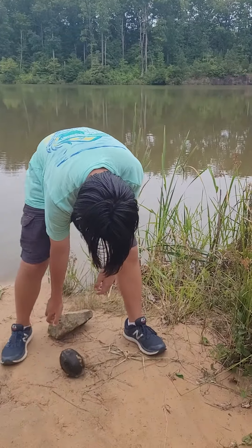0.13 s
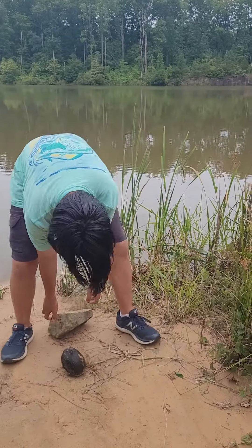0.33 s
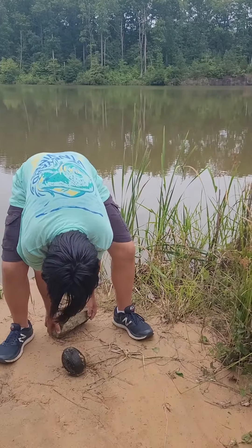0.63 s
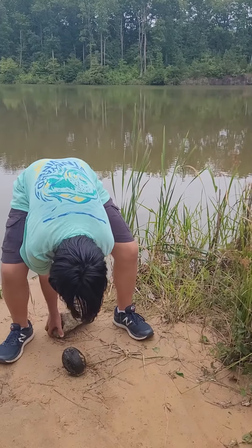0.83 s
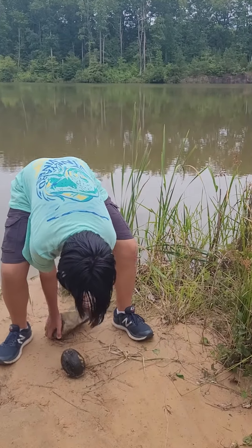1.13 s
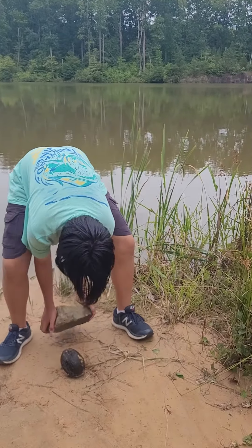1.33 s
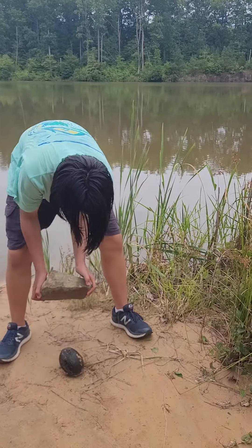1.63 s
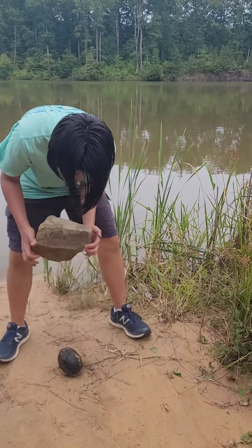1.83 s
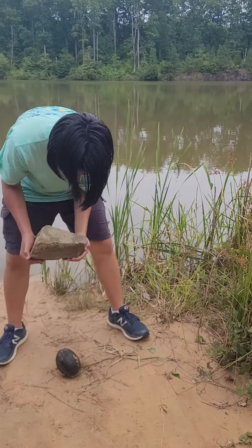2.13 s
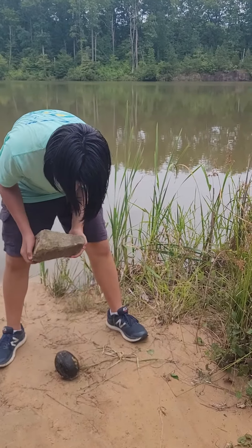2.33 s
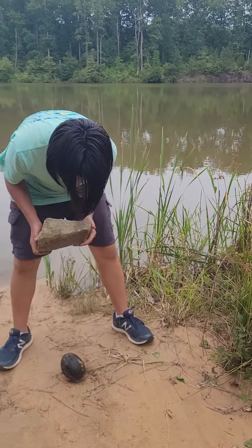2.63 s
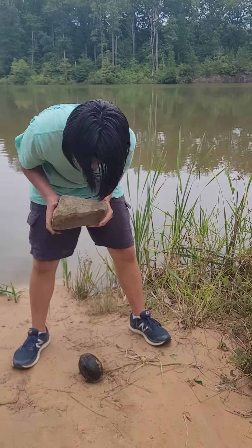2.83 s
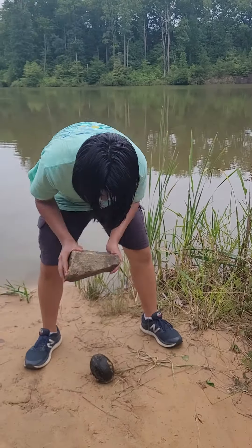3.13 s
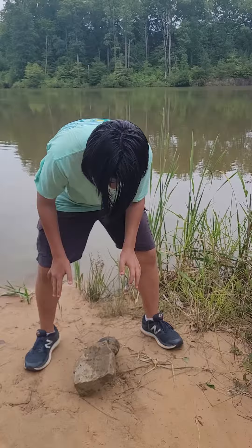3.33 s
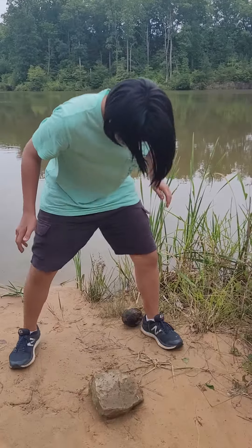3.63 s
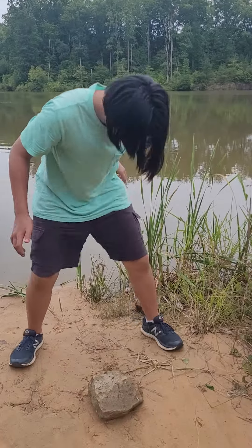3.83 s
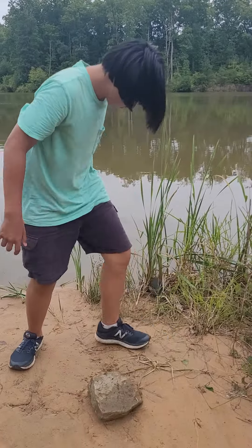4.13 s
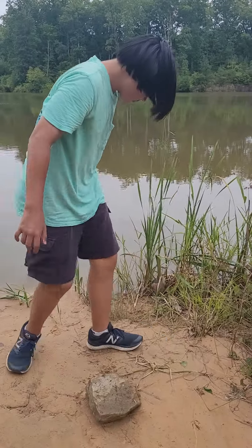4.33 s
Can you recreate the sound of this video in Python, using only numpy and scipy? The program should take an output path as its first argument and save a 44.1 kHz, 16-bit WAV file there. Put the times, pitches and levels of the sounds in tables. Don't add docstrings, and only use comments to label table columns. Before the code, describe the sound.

A quiet open-air shore, heard close up in stereo with no room echo. A distant engine drones low and unevenly throughout, with faint hum, a thin wavering whine and a soft low wash that swells and sinks. At 0.1 to 0.4 s sand scrapes and slips crisply as a stone is shifted, with small dull bumps. From 0.5 to 3 s there is little but the drone and faint brushes of cloth, growing slightly after 2 s. A rustle rises at 3.2 s, then at 3.28 s the stone hits the coconut: by far the loudest sound, a sharp, woody, hollow clack with bright shell ring, a gritty grind and a second knock about 0.03 s later, ending in a low thud. Around 3.55 to 3.62 s the stone slaps dully onto sand with a gritty slip. Cloth rustles and light shoe scuffs follow, clearest near 4.0 to 4.2 s, over the continuing drone.

```python
import sys
import numpy as np
from scipy import signal
from scipy.fft import rfft, irfft, next_fast_len
from scipy.io import wavfile
from scipy.ndimage import uniform_filter1d

SR = 44100
rng = np.random.default_rng(int(sys.argv[2]) if len(sys.argv) > 2 else 0)


def boost_factor(decibels):
    exponent = np.asarray(decibels, float) / 20
    return 10 ** exponent


def store_pcm(level_fs):
    pcm = np.round(np.clip(level_fs, -1, 1) * 32767).astype(np.int16)
    wavfile.write(sys.argv[1], SR, np.atleast_2d(pcm).T)


N = 198405
FAR_LAG = 7


def evened(x):
    return x / np.sqrt(np.mean(x ** 2) + 1e-20)


def read(points, hz):
    f, value = np.transpose(points)
    return np.interp(np.log(hz + 1), np.log(f + 1), value)


def curves(rows):
    s, *columns = np.transpose(rows)
    return [np.interp(np.arange(N) / SR, s, c) for c in columns]


def wander(rate_hz):
    lowpass = signal.butter(2, rate_hz, fs=SR / 64, output="sos")
    steps = signal.sosfilt(lowpass, rng.standard_normal(N // 64 + 700))[698:]
    return evened(np.interp(np.arange(N) / 64, np.arange(len(steps)), steps))


def swells(rows, coloured=False):
    roundness = 1.3
    t = np.arange(0, N + 64, 64) / SR
    power = 0
    for s, db, rise, fall, *colour_db in rows:
        drop_db = 20 * (abs(t - s) / np.where(t < s, rise, fall)) ** roundness
        power = power + boost_factor(db + coloured * sum(colour_db) - drop_db) ** 2
    return np.interp(np.arange(N) / SR, t, np.sqrt(power))


def shaped(pair, spectrum, tilt):
    size = next_fast_len(N)
    hz = np.fft.rfftfreq(size, 1 / SR)
    lean_db = np.array([[.5], [-.5]]) * read(tilt, hz)
    return evened(irfft(rfft(pair, size) * boost_factor(read(spectrum, hz) + lean_db), size)[:, :N])


def band(x, lo_hz, hi_hz):
    return evened(signal.sosfilt(signal.butter(3, [lo_hz, hi_hz], "bandpass", fs=SR, output="sos"), x))


def late_left(x):
    return np.array([np.roll(x, FAR_LAG), x])


def ports(x, same):
    other = rng.standard_normal(N) * np.sqrt(abs(uniform_filter1d(x ** 2, size=9)))
    same = np.clip(same, 0, 1)
    late = np.roll(x, 6)
    change = (same - 1) * late + np.sqrt(1 - same ** 2) * other
    treble = signal.butter(2, 2100, "highpass", fs=SR, output="sos")
    return np.array([late + signal.sosfiltfilt(treble, change), x])


# f/Hz, likeness [-1 to 1]
SAME = [(60, 0.96), (180, 0.99), (550, 0.92), (1650, 0.19), (4970, 1), (15000, -0.07)]
# f/Hz, left minus right level/dB
TILT = [(60, -3.5), (130, 0.5), (290, -3), (640, 0.5), (1410, -2.5), (3100, 4.5), (6820, -10.5),
        (15000, 1.5)]


def diffuse(spectrum):
    size = next_fast_len(N)
    a, b = rfft(rng.standard_normal((2, size)))
    same = np.clip(read(SAME, np.fft.rfftfreq(size, 1 / SR)), -1, 1)
    return shaped(irfft(np.array([a, same * a + np.sqrt(1 - same ** 2) * b]), size), spectrum, TILT)


# f/Hz, level/dB per Hz
AIR = [(35, -7), (59, 0.5), (127, -3), (200, -11), (285, -15), (416, -26.5), (900, -26.5), (1300, -33),
       (2050, -40), (2400, -56.5), (3500, -58), (6500, -50), (8700, -59), (11000, -49), (16000, -51)]


def air():
    return boost_factor(-48 + 0.37 * wander(3.7)) * diffuse(AIR)


# f/Hz, level/dB per Hz
WASH = [(41, -36.5), (70, -2), (81, -5), (121, 2), (183, -14), (233, -7), (323, -22), (500, -27),
        (650, -63.5), (1100, -120)]
# peak t/s, level/dB, rise t/s, fall t/s per 20 dB
GUSTS = [
    (.35, -41, 1., .8),
    (.8, -39, .5, .5),
    (1.15, -40, .5, .4),
    (1.55, -42, .6, .8),
    (2.1, -41, .8, .6),
    (2.6, -41, .6, .6),
    (2.95, -42, .5, .5),
    (3.6, -42, .3, .25),
    (4.1, -48, 1., 1.),
]


def wash():
    return swells(GUSTS) * boost_factor(-5.5 + 3.4 * wander(14.0)) * diffuse(WASH)


# peak t/s, level/dB, rise t/s, fall t/s per 20 dB
WHINE = [(.02, -61, .3, .3), (.33, -59, .4, .25), (.55, -61, .3, .3), (.92, -61, .3, .25),
         (1.2, -63, .2, .2), (1.55, -60, .4, .3), (1.78, -62, .3, .2), (2.15, -68, .6, .6),
         (2.56, -65, .2, .15), (2.74, -60, .2, .5), (3.1, -65, .6, 1.1), (4., -60, .4, .4),
         (4.45, -68, .4, .4)]


def whine():
    turns = 2 * np.pi * np.cumsum(886.8 + 1.2 * wander(6.0)) / SR
    return swells(WHINE) * boost_factor(1.8 + 1.2 * wander(8.0)) * np.cos(turns)


# f/Hz, level/dB
HUM = [(587, -76), (947, -82.5), (1179, -79), (1475, -95), (1776, -83)]


def hum():
    t = np.arange(N) / SR
    return sum(boost_factor(db + 4.5 * wander(3.7)) * np.cos(2 * np.pi * f * t) for f, db in HUM)


# t/s, firing rate f/Hz, level/dB
DRONE = [(0.0, 59.8, -49), (0.06, 58.5, -43), (0.35, 56.5, -49), (0.41, 53.1, -56), (0.56, 56.4, -49),
         (0.71, 53.1, -53), (0.78, 55.1, -43), (0.86, 56.4, -49), (1.08, 53.1, -49), (1.21, 53.1, -57),
         (1.43, 57.4, -44), (1.87, 57.2, -51), (1.95, 53.5, -49), (2.12, 57.3, -45), (3.27, 57.2, -43),
         (3.68, 57.2, -52), (4.42, 57.2, -45), (4.5, 57.2, -51)]
# multiple, level/dB
FIRING = [(1, 4), (2, -8.5), (3, -13.5), (4, -12.5), (5, -15.5)]


def drone():
    hz, drone_db = curves(DRONE)
    turns = 2 * np.pi * np.cumsum(hz * (1 + 0.02955 * wander(12.0))) / SR
    pulses = sum(boost_factor(db + 2.2 * wander(9.0)) * np.cos(k * turns) for k, db in FIRING)
    return boost_factor(drone_db - .6) * pulses


def machine():
    tones = drone() + whine() + hum()
    return boost_factor([[-.7], [.7]]) * late_left(tones) + wash()


def grains(per_s, spread_db):
    size = boost_factor(spread_db * np.minimum(rng.exponential(1, N), 5))
    return evened(size * rng.standard_normal(N) * (rng.random(N) < per_s / SR))


# f/Hz, level/dB per Hz
GRIT = [(260, -43), (450, -8.5), (684, -6), (868, -6.5), (1040, -3.5), (1360, -11.5), (2260, -3.5),
        (4050, -13.5), (4430, -10.5), (6530, -10.5), (8930, -17), (9480, -16), (9920, -13.5),
        (11700, -12.5), (16000, -14.5)]
# f/Hz, left minus right level/dB
GRIT_TILT = [(60, -3), (130, 2), (290, -16.5), (640, 9), (1410, -14.5), (3100, 1), (6820, -5), (15000, 1)]


def sand(per_s, spread_db):
    return shaped(ports(grains(per_s, spread_db), 0.15), GRIT, GRIT_TILT)


# t/s, level/dB, t60 t/s
SLIPS = [
    (0.1416, -44, 0.075),
    (0.3618, -37.5, 0.2),
    (1.904, -72, 0.048),
    (2.57, -58, 0.016),
    (3.5541, -40, .025),
    (3.575, -50, 0.042),
    (3.621, -53, 0.093),
    (3.93, -58, 0.071),
    (4.101, -54, .02),
    (4.17, -40, .05),
]


def slips():
    gain = np.zeros(N)
    for s, db, t60 in SLIPS:
        part = gain[round(s * SR):][:SR // 2]
        part += boost_factor(db - 60 * np.arange(len(part)) / SR / t60)
    return gain


# peak t/s, grit level/dB, rise t/s, fall t/s per 20 dB, weight level/dB
SCUFFS = [(.04, -60, .3, .06, -4), (.153, -48, .014, .04, -6), (.2, -62, .05, .2, 2),
          (.312, -50, .04, .028, 2), (.372, -46, .015, .14, 0), (.53, -72, .1, .15, 9),
          (2.05, -67, .2, .2, -5), (2.5, -73, .25, .25, 6), (2.95, -72, .15, .2, 3),
          (3.37, -57, .03, .36, -1), (4.43, -75, .1, .2, -3), (3.582, -52, .04, .04, -8),
          (3.62, -64, .03, .2, 0), (4.01, -61, .1, .08, 0), (4.18, -57, .012, .22, -1),
          (4.37, -61, .08, .07, -3)]
# peak t/s, fine hiss level/dB, rise t/s, fall t/s per 20 dB, grit over hiss level/dB
CLOTH = [(.72, -71, .3, .2, -11), (.84, -69, .1, .08, -10), (.93, -70, .12, .06, -6),
         (1.06, -69, .12, .15, -5), (1.14, -71, .1, .07, 2), (1.73, -71, .1, .4, -8),
         (1.92, -65, .04, .07, -10), (2.02, -69, .15, .25, -5), (2.2, -65, .15, .25, -2),
         (2.375, -64, .17, .08, -6), (2.68, -70, .12, .35, -8), (2.85, -62, .08, .13, -8),
         (2.99, -61, .2, .11, -7), (3.12, -63, .1, .08, -7), (3.222, -47, .06, .045, -12),
         (3.558, -48, .008, .045, -12), (3.63, -58, .06, .1, -8), (3.76, -64, .2, .2, -4),
         (3.87, -62, .06, .1, -5), (3.93, -60, .06, .1, -7), (4.01, -54, .09, .08, -10),
         (4.085, -61, .06, .15, -9), (4.22, -53, .075, .17, -10), (4.38, -62, .15, .13, -10)]


def rustle():
    scuff, heavy = swells(SCUFFS), swells(SCUFFS, True)
    cloth, dull = swells(CLOTH), swells(CLOTH, True)
    grit = sand(18000., 1.8)
    bands = [(3900, 7100, boost_factor(2.2) * np.hypot(scuff, dull)),
             (480, 1920, np.hypot(boost_factor(1.4) * heavy, boost_factor(-69))),
             (1850, 3200, np.hypot(boost_factor(1.8) * heavy, boost_factor(-4) * dull)),
             (10000, 17700, np.hypot(boost_factor(-2.1) * scuff, boost_factor(4.) * cloth))]
    layers = sum(gain * boost_factor(1.12 * wander(33.4)) * band(grit, lo, hi) for lo, hi, gain in bands)
    return boost_factor(1.5 * wander(25.0)) * layers + slips() * np.roll(grit, SR, axis=1)


def ring(drive, modes):
    t = np.arange(4096) / SR
    shape = 0
    for hz, t60, left_db, right_db in modes:
        decay = boost_factor(np.array([[left_db], [right_db]]) - 60 * t / t60)
        shape = shape + decay * np.sin(2 * np.pi * hz * t)
    return signal.oaconvolve(drive, shape, axes=1)[:, :N]


# f/Hz, t60 t/s, left level/dB, right level/dB
THUD = [(250.2, 0.043, -7.5, -5.5), (108.45, 0.078, -20, -21.5)]


def ground(drive):
    return ring(drive, THUD)


# f/Hz, t60 t/s, left level/dB, right level/dB
BODY = [(690, .025, -2.5, -1.5), (830, .028, -11, -8), (520, .022, -13, -12)]


def hollow(drive):
    return ring(drive, BODY)


# f/Hz, t60 t/s, left level/dB, right level/dB
SHELL = [(1720, .025, -18, -12.5), (1860, .045, -10, .3), (1975, .04, -8, .8), (2360, .03, -9, -4),
         (1430, .008, -30, -25), (2560, .03, -6, -12), (2740, .03, -6, -14), (3200, .02, -5, -7),
         (3800, .018, -6, -14), (4400, .014, -7, -14), (5500, .006, -21, -20), (6850, .006, -16, -10),
         (10600, .004, -17, -17), (14000, .003, -24, -25)]


def hard_shell(low_drive, high_drive):
    return ring(low_drive, SHELL[:7]) + ring(high_drive, SHELL[7:])


# t/s, pressure level/dB
GRIND = [
    (3.2832, -90),
    (3.2846, -29),
    (3.29, -29),
    (3.294, -24),
    (3.316, -24),
    (3.319, -21),
    (3.3238, -23.5),
    (3.3265, -35),
    (3.345, -43),
]


def grind():
    t = np.arange(N) / SR
    settle_db_per_s = 145
    pressure_db = curves(GRIND)[0] - settle_db_per_s * np.maximum(t - GRIND[-1][0], 0)
    first_db = 17 * np.exp(-abs(t - GRIND[1][0]) / .004)
    crunch_db = -6 + .4 * (pressure_db - pressure_db.max()) + first_db
    chatter = ports(grains(5000., 3.6), 0.2)
    woody = evened(hollow(chatter) + ground(chatter))
    rung = evened(hard_shell(chatter, chatter)) + boost_factor(-20) * woody
    crunch = band(sand(14000., 2.4), 2700, 13500)
    return boost_factor(pressure_db) * (rung + boost_factor(crunch_db) * crunch)


# t/s, strength level/dB, contact t/ms, share into
BLOWS = [(3.2841, -9.5, .3, .92), (3.2843, -18, .05, .05), (3.2866, -10, .16, .1), (3.2882, -22, .18, .05),
         (3.2925, -28, .2, .1), (3.3175, -26, .12, .05), (3.3255, -18, 3.2, .99), (3.336, -15, 5.6, .995),
         (3.347, -12, 9.5, .999), (.144, -31, 3.1, .99), (.3, -36, 3.1, .99), (.364, -31, 2.6, .98),
         (3.6, -29, 4.1, .995), (3.617, -22, 4.1, .995), (4.1, -50, .2, .2), (4.171, -42, .3, .6),
         (4.378, -52, .2, .1)]


def knock():
    body, shell = np.zeros((2, N))
    for s, db, ms, share in BLOWS:
        push = np.hanning(int(ms * SR / 1000) + 3)[1:-1]
        push = boost_factor(db) * push / push.sum()
        at = round(s * SR)
        body[at:at + len(push)] += share * push
        shell[at:at + len(push)] += (1 - share) * push
    low = late_left(body)
    return ground(low) - hollow(low) + hard_shell(late_left(shell), shell[None])


def scene():
    return air() + machine() + rustle() + grind() + knock()


def low_pass(x):
    return signal.sosfilt(signal.butter(12, 16280, fs=SR, output="sos"), x)


def record(dry):
    thin = signal.sosfilt(signal.butter(2, 38., "highpass", fs=SR, output="sos"), dry)
    duck_most_db, duck_from_db, duck_wait_s, recover_db_per_s = 3.5, -26, .055, 2
    loud = uniform_filter1d((thin ** 2).mean(0), size=441) > boost_factor(duck_from_db) ** 2
    climb_db = recover_db_per_s * np.arange(N) / SR
    duck_db = np.maximum.accumulate(duck_most_db * loud + climb_db) - climb_db
    duck_db = uniform_filter1d(np.pad(duck_db, (round(duck_wait_s * SR), 0))[:N], size=882)
    soft = 2 * np.tanh(thin / boost_factor(duck_db) / 2)
    lowpass = signal.firwin(511, 15900, window=("kaiser", 9), fs=SR)
    return low_pass(signal.oaconvolve(soft, lowpass[None], "same"))


dry = scene()
out = record(dry)
store_pcm(out)
```